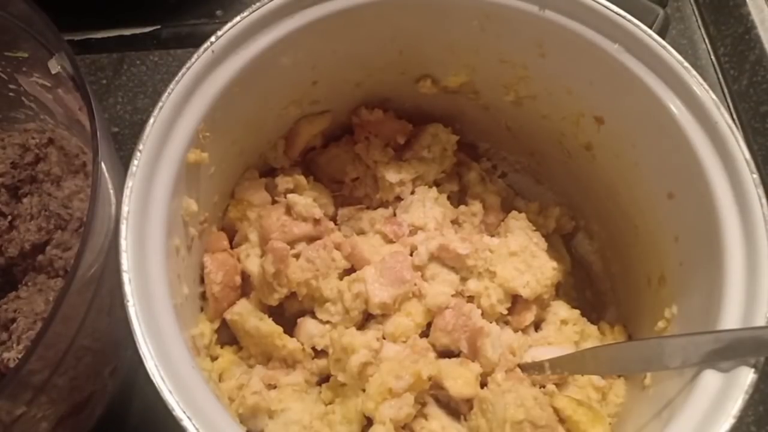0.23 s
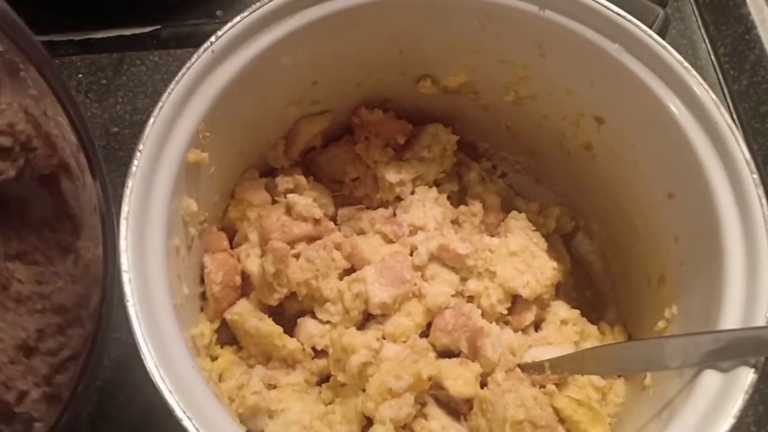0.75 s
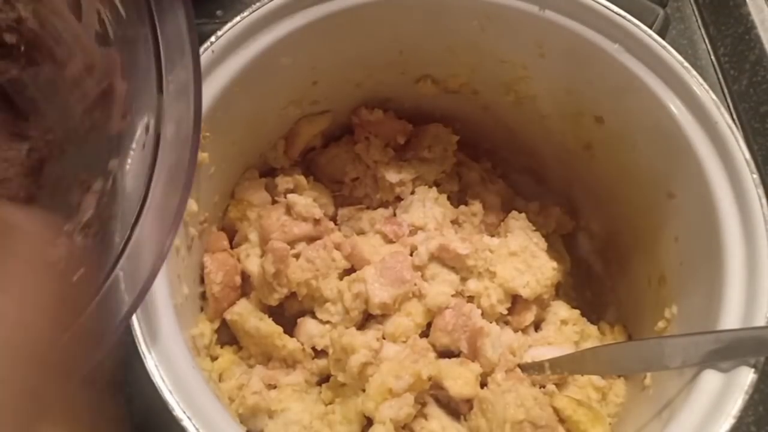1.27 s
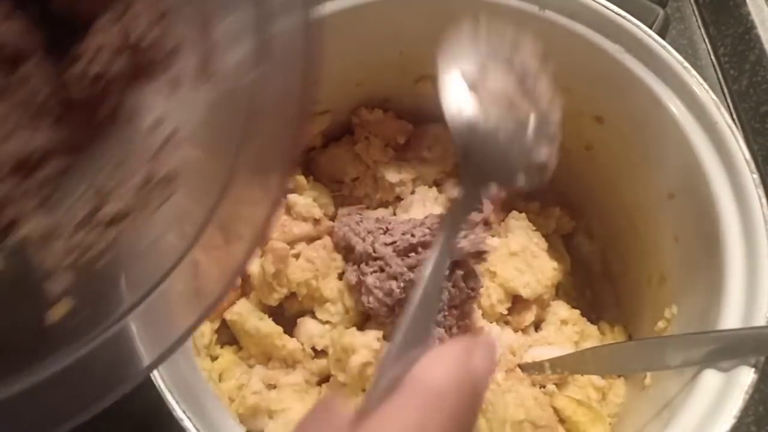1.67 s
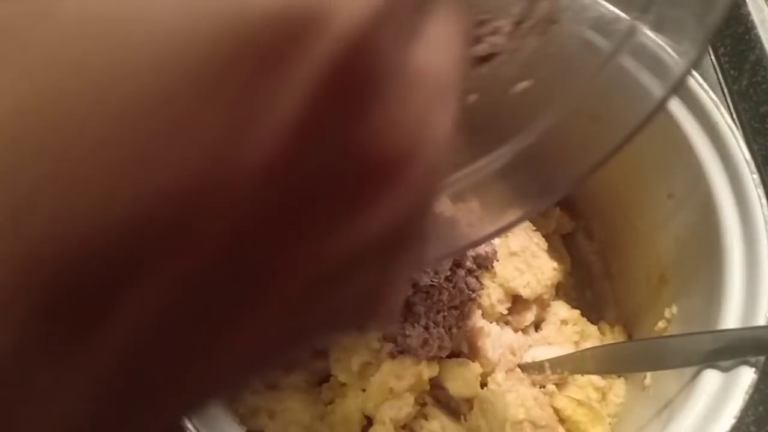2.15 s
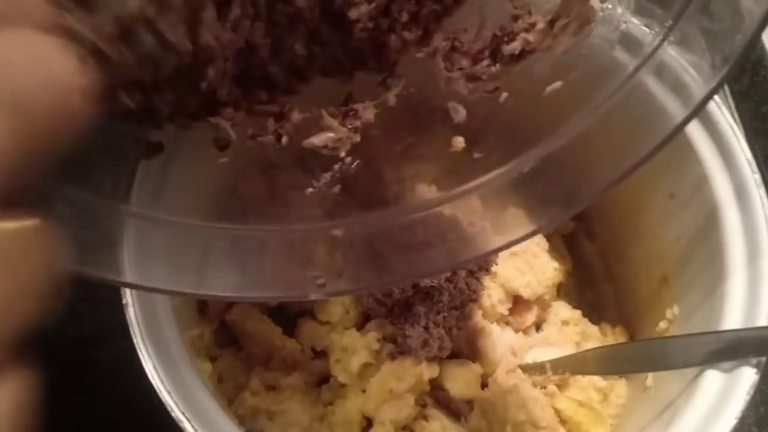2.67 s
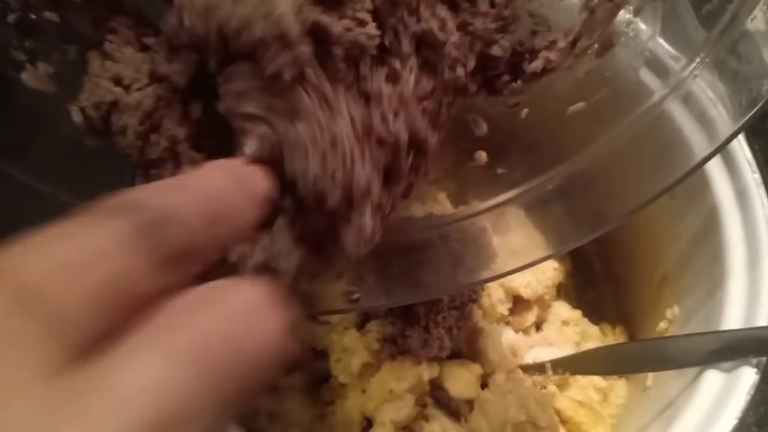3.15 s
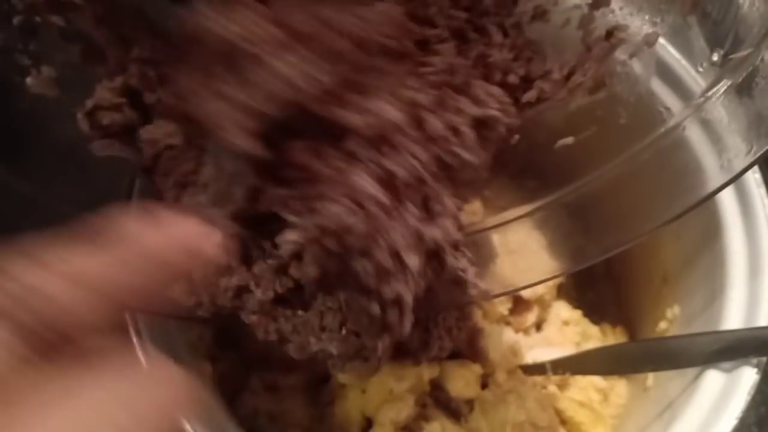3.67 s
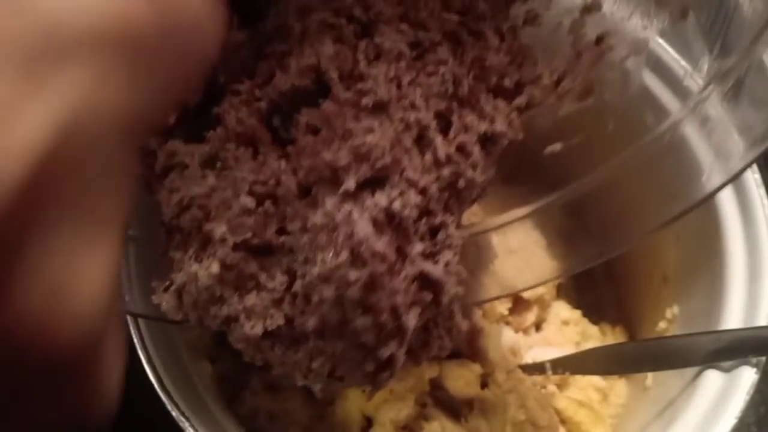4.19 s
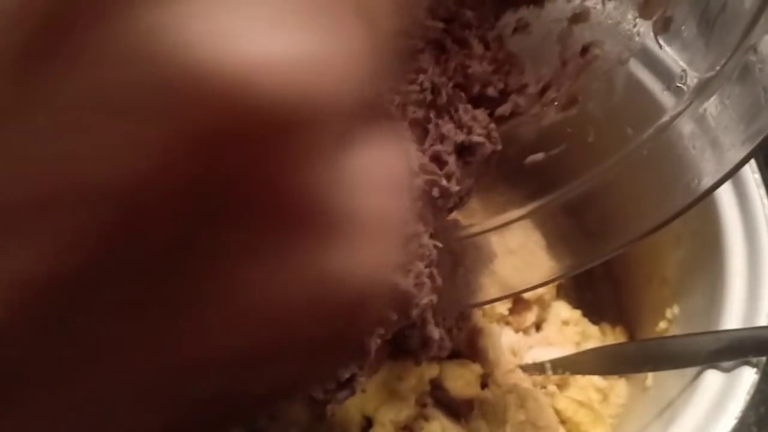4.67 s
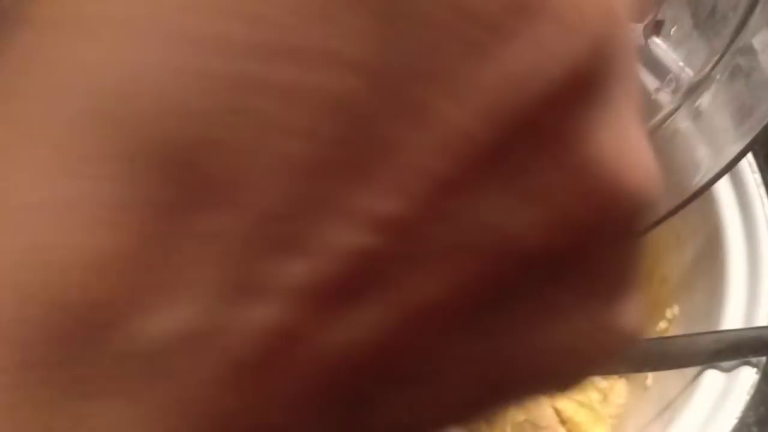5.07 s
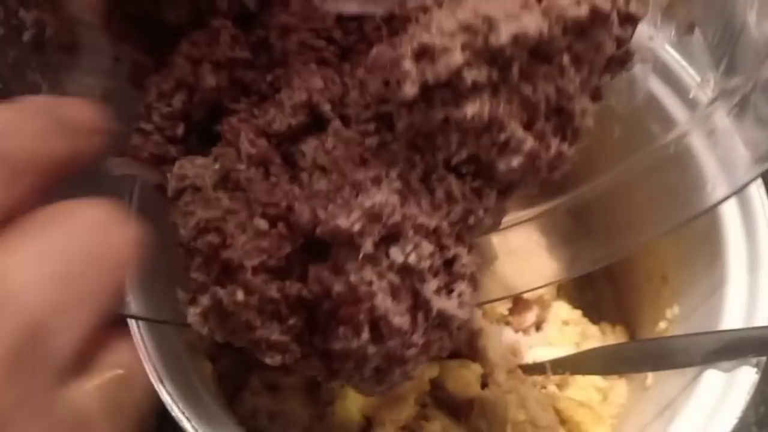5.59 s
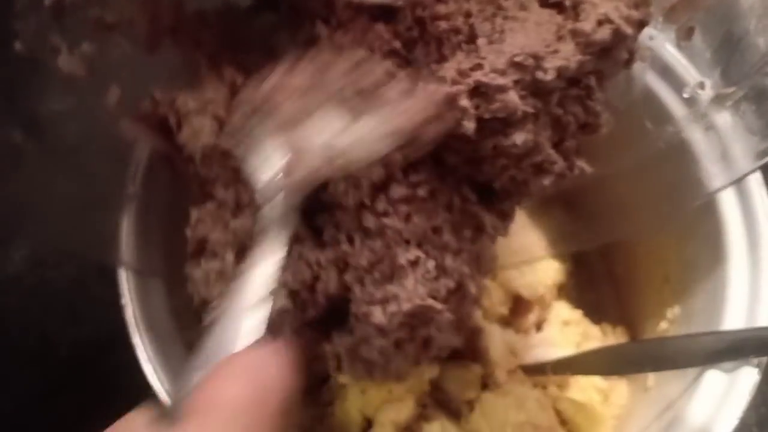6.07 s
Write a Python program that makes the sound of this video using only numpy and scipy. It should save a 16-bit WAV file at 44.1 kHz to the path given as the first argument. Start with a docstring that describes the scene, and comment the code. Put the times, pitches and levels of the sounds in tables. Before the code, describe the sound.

A spoon works a thick, damp mixture out of a glass bowl resting on a metal pot, close to the microphone. Short gritty rasps and wet squelches come in uneven strokes. Damped, hollow knocks and bright spoon clinks cut through, strongest past the middle, then a piercing glass squeak rings briefly. Scraping continues to the end, with faint room air and short indoor reflections.

```python
"""A spoon scrapes a thick, moist mixture out of a glass bowl: friction made of noise and tiny random slips.
The bowl is slid off a kitchen counter and tipped over a metal pot, close to the microphone.
Spoon, bowl and pot knock together: shaped noise bursts, with decaying sines for pot, counter and spoon.
Sticking on the glass gives gliding squeals (sines with overtones) and rough skids (narrow noise).
A small hard room answers through a noise-built impulse response; faint air noise lies beneath."""
import sys
import numpy as np
from scipy import signal
from scipy.fft import rfft, irfft, next_fast_len
from scipy.io import wavfile

SR = 44100
rng = np.random.default_rng(int(sys.argv[2]) if len(sys.argv) > 2 else 0)


def inscribe(sig):
    """Save sig as 16-bit PCM at rate SR to the path in sys.argv[1].

    A 1-D sig is mono; a 2-D sig holds one channel per row.
    Samples are clipped to [-1, 1] before scaling.
    """
    pcm = np.round(np.clip(np.atleast_2d(sig).T, -1, 1) * 32767)
    wavfile.write(sys.argv[1], SR, pcm.astype(np.int16))


N = 279594
TIME = np.arange(N) / SR

# Still air of the kitchen: (frequency [Hz], relative density [dB per Hz])
AIR_SPECTRUM = [(22, -1), (35, -2.5), (48, 8.5), (62, -3), (80, -5), (140, 2.5), (300, -10), (480, -2.5),
                (800, -9), (1400, -15.5), (2500, -6.5), (3500, -29.5), (4900, -15), (7000, -29),
                (10500, -33.5), (13500, -36), (16000, -31.5)]
AIR_DB = -62.5
# Room decay: (frequency [Hz], t60 [s])
ROOM_DECAY = [(100, 0.58), (500, 0.53), (2500, 0.38), (6000, 0.42), (15000, 0.57)]
SQUEAL_ROOM_DB = 7   # the squeal radiates from the whole bowl, more of it into the room
RIGHT_LEAD_S, CUTOFF_HZ = 0.00024, 16000

# Dull bumps that set the counter booming: (time [s], relative level [dB], favoured pitch [Hz])
COUNTER_BUMPS = [(1.338, -40.5, 114), (1.43, -46, 135), (2.136, -42.5, 132), (2.205, -53.5, 151),
                 (3.667, -53.5, 147.3), (3.714, -58, 304), (4.373, -46, 259), (5.227, -55, 230),
                 (6.072, -61, 125)]
# Counter modes: (frequency [Hz], relative level [dB], t60 [s])
COUNTER_RINGS = [(113.7, 3, 0.47), (121.6, -18, 0.18), (142.6, 1.5, 0.17), (165.7, -1.5, 0.55),
                 (218, -0.5, 0.23), (240.6, -1.5, 0.28), (306, -8.5, 0.064)]
# Modes of the bowl resting on the pot: (frequency [Hz], relative level [dB], t60 [s])
POT_RINGS = [(239.8, -4, 0.21), (298, -5, 0.19), (485.2, -1, 0.17), (540, 2, 0.04), (576, -6, 0.11),
             (918, -10.5, 0.18), (1020, -15.5, 0.4), (1067.6, -2.5, 0.11), (1208, 0.5, 0.066),
             (1244, -19.5, 0.042), (1296, -6.5, 0.085), (1362, -6.5, 0.052), (1790, -10, 0.034),
             (1960, -24.5, 0.13), (2430, -22.5, 0.14), (2690, -28.5, 0.073), (2867, -8.5, 0.055)]

# The spoon rings freely: (time [s], relative level [dB])
SPOON_CLINKS = [(2.143, -43), (4.376, -37.5)]
# Spoon modes: (frequency [Hz], relative level [dB], t60 [s])
SPOON_RINGS = [(1927, -4, .16), (2300, -8, .07), (3880, -6, .06), (4021, -2, .11), (4330, -7, .05),
               (4694, -5, .08), (4823, -7, .09), (4960, -8, .06), (5098, -16, .1), (13600, -16, .07)]
# Spoon against glass, bending note: (time [s], first pitch [Hz], last pitch [Hz], level [dB], t60 [s])
SPOON_TWANGS = [(2.992, 960, 920, -25, .15), (4.374, 325, 280, -19, .15), (4.375, 1270, 1220, -19.5, .18),
                (4.765, 1400, 1190, -18, .1), (5.228, 1240, 1160, -23, .2), (5.603, 1280, 1200, -31, .09),
                (5.711, 1420, 1380, -19, .07)]

# Placed sticky ticks: (time [s], relative level [dB], pitch [Hz])
PLACED_TICKS = [(0.18, -40, 3140), (1.624, -33.5, 5070), (2.2985, -34.5, 5200), (2.376, -34, 4930),
                (2.8505, -32, 4740), (2.958, -32.5, 2680), (3.1316, -31.5, 1850), (3.4644, -38, 2180),
                (3.8327, -35, 2780), (3.905, -32.5, 2350), (3.9417, -26.5, 2435), (3.9693, -29.5, 2490),
                (4.0807, -38.5, 5240), (4.113, -32.5, 5000), (5.0308, -38, 3050), (5.077, -33, 5400),
                (5.871, -33.5, 4980), (5.93, -32, 2530)]
# Tick spectrum: (frequency [Hz], relative level [dB])
TICK_SPECTRUM = [(300, -28.5), (1200, -3.5), (2700, 2), (3700, -8.5), (5300, 6), (7500, -13),
                 (10500, -16.5), (13500, -12), (16000, -10)]
# Random ticks during strokes
TICKS_PER_S, TICK_OVER_SQUELCH_DB, TICK_SPREAD_DB = 9.7, 10.5, 12
TICK_LOW_HZ, TICK_HIGH_HZ = 2200, 5400

# Lumps of mixture slump: (start [s], length [s], relative level [dB])
LUMP_SLUMPS = [(-0.02, 0.025, -37.5), (1.6, 0.033, -44.5), (2.18, .06, -48), (3.085, 0.032, -37.5),
               (3.67, 0.027, -65), (4.03, 0.042, -59), (6.055, 0.071, -36.5)]
# Slump spectrum: (frequency [Hz], relative level [dB])
SLUMP_SPECTRUM = [(50, -23), (120, -5.5), (260, -2.5), (500, -8.5), (900, -11), (2000, -14), (4000, -24)]
SLUMP_ATTACK_S, SLUMP_T60_S = 0.0067, 0.3
# The bowl drags and judders: (start [s], length [s], relative level [dB])
BOWL_DRAGS = [(-0.03, 0.24, -44.5), (0.47, 0.19, -33.5), (0.57, 0.16, -29), (2.55, 0.19, -50),
              (3.15, 0.6, -58.5), (5.566, .015, -39.5), (6.05, 0.026, -44.5)]
# Drag spectrum: (frequency [Hz], relative level [dB])
DRAG_SPECTRUM = [(120, -22), (250, -3), (380, 1.5), (480, -0.5), (580, 10), (700, -8), (850, -1.5),
                 (1200, -26), (1600, -41)]
DRAG_ATTACK_S, DRAG_T60_S = 0.013, 0.61

# Rough half-squeals while the spoon skids: (start [s], length [s], pitch [Hz], level [dB])
SPOON_SKIDS = [(0.009, 0.11, 2860, -39), (0.022, 0.075, 1980, -40.5), (0.177, 0.027, 2900, -40.5),
               (0.305, 0.016, 3030, -30), (1.216, 0.046, 2800, -50), (2.142, 0.023, 4440, -26),
               (2.855, 0.013, 4800, -37.5), (3.017, 0.01, 2280, -22), (3.462, 0.013, 2570, -42.5),
               (5.2, 0.029, 1260, -24.5), (5.212, 0.009, 1950, -7), (5.602, 0.011, 634, -31),
               (5.923, 0.22, 2430, -47), (6.188, 0.2, 2240, -44)]
# Squeals: (start [s], length [s], first pitch [Hz], last pitch [Hz], relative level [dB], release t60 [s])
GLASS_SQUEALS = [(5.14, 0.027, 2785, 2481, -1, 0.16), (5.595, 0.074, 2322, 2180, -28.5, .12),
                 (6.177, .16, 2110, 2390, -46, .1)]
# Squeal overtones: (multiple of the pitch, level at full strength [dB])
SQUEAL_OVERTONES = [(.5, -51), (1.5, -53), (2, -35), (5, -55)]
# Glass singing on after a squeal: (frequency [Hz], relative level [dB], t60 [s])
GLASS_RINGS = [(2510, -19, 0.67), (2600, -12, 0.36), (2670, -33.5, 0.44), (2500, -21, .35)]
SQUEAL_ATTACK_S, SQUEAL_GLIDE_S, SQUEAL_GRIP_S = 0.018, 0.0416, 0.039
SQUEAL_FLUTTER_DB, SQUEAL_FLUTTERS_PER_S = 6, 130

# Knocks of spoon, bowl and pot: (time [s], relative strength [dB], weight behind the blow [dB],
# hardness [dB per octave], L-R [dB], rattle re first contact [dB], pot ring re blow [dB],
# low favoured pitch [Hz], high favoured pitch [Hz])
BLOWS = [(0.307, -40.5, 7, 4, 0.5, -3, 1, 593, 1900), (0.675, -16, 3, 0.86, 2, -8, -17, 452, 2160),
         (0.686, -31.5, -12, -5, -2, -2, 2, 460, 2050), (0.8, -25, 0.5, 5, -3, -4.5, -6, 510, 1910),
         (0.88, -35.5, 6.5, 1.5, -3, -2, -1, 446, 1900), (1.113, -39, 13, 1.4, -4.5, -1.5, -6, 291, 940),
         (1.331, -27.5, 8, -2, -2, 7.5, 0.5, 598, 783), (1.426, -37.5, 15.5, 1.5, -4, -6, -3, 300, 786),
         (2.136, -19.5, 23.5, 2.1, 0.5, -10, -8.5, 367, 2070),
         (2.413, -20.5, -8.5, -0.25, -8.5, -17, -10, 592, 2135), (2.86, -56, 8, 10.5, 0, -12, 1, 584, 920),
         (2.989, -18.5, -7.5, 0.5, -6.5, -10, -5.5, 518, 1533),
         (3.017, -24.5, -4, 4, 2.5, 0, -30, 545, 2000), (3.026, -33, -21, -2.5, -5, -8, -0.5, 435, 920),
         (3.665, -32, 15, 0.8, 3.5, -5, -10, 278, 2130), (3.713, -49.5, 9, -6.5, -10, -3, -4, 487, 610),
         (3.916, -33.5, -3, -4, 2, -4, -8.5, 543, 633), (4.372, -14.5, 7, 3, 1.5, 1, -5.5, 475, 1270),
         (4.472, -16.5, -4.5, 3.5, -4.5, -6.5, -10, 505, 1103),
         (4.491, -23, -12, 3, 6, -15.5, -12.5, 470, 1070), (4.762, -20, -9, 2, 0.5, -11, -3.5, 519, 1235),
         (5.213, -23.5, -4.5, 4.5, -0.5, -1, 2, 785, 1810), (5.226, -16, -4, 1.5, -1, 3, -13.5, 479, 1410),
         (5.567, -40.5, -21, -8, -6, -1, 0.5, 517, 930),
         (5.602, -32, -12, -5.5, -2.5, -26, -6.5, 576, 1310),
         (5.71, -21.5, -3.5, 1.3, 3.5, -10, -25, 456, 1326)]
# Borders of the five knock registers: (frequency [Hz])
REGISTER_EDGES_HZ = [125, 280, 750, 1600, 3300, 16000]
# Thump, hollow, clack, clink, edge; weight adds thump, deadens clack: (relative level [dB], weight share)
REGISTERS = [(-12.5, 0.84), (-0.5, 0.089), (-3, -0.2), (1, -0.069), (-13, 0.27)]
# Knock spectrum: (frequency [Hz], relative density [dB per Hz])
KNOCK_SPECTRUM = [(80, -3.5), (300, -5.5), (500, 4), (750, -11), (1300, -8), (2400, 6.5), (3200, -6),
                  (3850, -8.5), (5100, -2.5), (6200, -12), (7200, -21.5), (10500, -37), (13500, -23),
                  (16000, -38)]
KNOCK_DB = -16

# Spoon strokes: (start [s], length [s], relative levels of rasp on the glass [dB],
# squelch of the mixture [dB], fine wet crackle [dB])
SPOON_STROKES = [(-0.03, 0.41, -48.5, -61, -83), (0.431, .32, -47, -50.5, -66), (0.78, 0.14, -44, -59, -86),
                 (0.942, 0.29, -54.5, -59, -73.5), (1.451, 0.16, -56, -63, -77),
                 (1.581, 0.023, -47.5, -54.5, -62.5), (1.84, .25, -61.5, -75, -87),
                 (2.231, 0.2, -53, -58, -74), (2.423, 0.29, -43.5, -48, -66.5),
                 (2.75, 0.1, -57, -55.5, -64.5), (3.015, 0.28, -55, -56.5, -67.5),
                 (3.337, 0.11, -58.5, -58, -78), (3.475, 0.37, -49, -54, -70),
                 (3.877, .24, -54.5, -54.5, -71), (4.16, 0.14, -60.5, -69, -91),
                 (4.499, 0.14, -44.5, -56.5, -92), (4.785, 0.16, -44, -47.5, -68.5),
                 (5.004, .08, -59, -56, -70), (5.257, 0.22, -57, -56, -72.5),
                 (5.521, 0.081, -47.5, -50.5, -68.5), (5.79, 0.29, -48.5, -53, -70.5),
                 (6.081, .26, -52, -52.5, -72.5)]
# Rasp spectrum: (frequency [Hz], relative level [dB])
RASP_SPECTRUM = [(250, -19.5), (550, -4), (800, -4.5), (1300, -8.5), (1950, 0.5), (2300, -0.5), (2800, 2.5),
                 (3500, -12), (4500, -16.5)]
# Squelch spectrum: (frequency [Hz], relative level [dB])
SQUELCH_SPECTRUM = [(2500, -29.5), (3600, -3), (4400, -1.5), (5200, 5), (6200, -6), (7500, -13),
                    (10000, -30)]
# Crackle spectrum: (frequency [Hz], relative level [dB])
CRACKLE_SPECTRUM = [(5500, -3.5), (7500, -20), (10500, -1), (12000, 2.5), (13700, 4.5), (15200, 6.5),
                    (16000, -10.5)]
STROKE_ATTACK_S, STROKE_T60_S = 0.039, 0.33
STROKE_WOBBLE_DB, STROKE_WOBBLES_PER_S = -1.5, 16


def from_db(db):
    """Decibels to gain."""
    return 10 ** (np.asarray(db) / 20)


def rms_one(x):
    """Scale to unit power."""
    return x / np.sqrt(np.mean(x ** 2) + 1e-20)


def at_hz(points, hz):
    """Read a table along log frequency."""
    f, value = np.transpose(points)
    return np.interp(np.log(np.maximum(hz, 1)), np.log(f), value)


def band(x, low_hz, high_hz):
    """Causal band-pass."""
    edges_hz = [low_hz, min(high_hz, .45 * SR)]
    return signal.sosfilt(signal.butter(3, edges_hz, "band", fs=SR, output="sos"), x)


def coloured(x, spectrum):
    """Filter by a spectrum that falls away steeply beyond its ends; rms 1."""
    size = next_fast_len(x.shape[-1])
    hz = np.fft.rfftfreq(size, 1 / SR) + 1
    skirts = np.minimum(1, np.minimum(hz / spectrum[0][0], spectrum[-1][0] / hz)) ** 3
    shaped = irfft(rfft(x, size) * from_db(at_hz(spectrum, hz)) * skirts, size)
    return rms_one(shaped[..., :x.shape[-1]])


def drift(knots_per_s):
    """Random curve, linear between knots; rms 1."""
    knots = rng.standard_normal(int(N / SR * knots_per_s) + 2)
    return rms_one(np.interp(TIME * knots_per_s, np.arange(len(knots)), knots))


def noise(size, alike):
    """Stereo white noise; alike is the power share common to both ears."""
    alike = np.clip(alike, 0, 1)
    shared, *separate = rng.standard_normal((3, size))
    return np.sqrt(alike) * shared + np.sqrt(1 - alike) * np.array(separate)


def dying(t, t60_s):
    """Exponential decay."""
    return from_db(-60 * t / t60_s)


def add(out, start_s, sound):
    """Mix a sound in at a time."""
    i = max(0, int(start_s * SR))
    out[..., i:i + sound.shape[-1]] += sound[..., :N - i]


def swell(start, length, attack_s, t60_s):
    """A push builds up, holds until its length is over and dies away."""
    t = TIME - start
    attack = np.sin(np.pi / 2 * np.clip(t / attack_s, 0, 1)) ** 2
    return attack * dying(np.maximum(t - length, 0), t60_s)


def pushes(rows, attack_s, t60_s):
    """One gain curve for each level column of (start, length, dB, ..) rows; overlaps add in power."""
    power = 0
    for start, length, *db in rows:
        power = power + (from_db(db)[:, None] * swell(start, length, attack_s, t60_s)) ** 2
    return np.sqrt(power)


def friction(spectrum, per_s, size_db, clump_db, smooth):
    """Clumps of tiny slips of uneven size over a smooth rub; rms 1."""
    slips = rng.random(N) < per_s * from_db(clump_db * drift(45)) / SR
    sizes = from_db(np.abs(size_db) * np.minimum(rng.exponential(1, N), 4))
    grains = rms_one(slips * sizes * noise(N, 0.11))
    return coloured(grains + smooth * noise(N, 0.52), spectrum)


def struck(blows, modes, scatter_db, phase_spread):
    """Every blow (s, dB at each mode) rings all modes, in a slightly different phase at either ear."""
    out, t = np.zeros((2, N)), TIME[:SR]
    hz, mode_db, t60_s = np.transpose(modes)
    onset = np.tanh(hz[:, None] * t)
    rings = np.exp(2j * np.pi * hz[:, None] * t) * dying(t, t60_s[:, None]) * onset
    for s, db in blows:
        strength = from_db(db + mode_db + scatter_db * rng.standard_normal(len(hz)))
        phase = np.exp(1j * phase_spread * rng.standard_normal((2, len(hz))))
        add(out, s, ((strength * phase) @ rings).imag)
    return out


def nearness(modes, favoured_hz, octaves):
    """1 for a mode that the point of contact favours, 0 for distant ones."""
    return np.exp(-(np.log2(np.array(modes)[:, 0] / favoured_hz) / octaves) ** 2)


def resonant(x, pitches_hz, q, boost_db):
    """Lift a narrow peak at each pitch."""
    peaks = sum(signal.lfilter(*signal.iirpeak(hz, q, fs=SR), x) for hz in pitches_hz)
    return x + from_db(boost_db) * peaks


def knock_centres():
    """Middle of each register of a knock, in Hz."""
    return np.sqrt(np.multiply(REGISTER_EDGES_HZ[:-1], REGISTER_EDGES_HZ[1:]))


def knock_levels(strength_db, weight_db, hardness_db):
    """Level of each register: a hard contact tilts it to the treble, a heavy one thumps."""
    plain_db, weight_share = np.transpose(REGISTERS)
    octaves = np.log2(knock_centres() / np.median(knock_centres()))
    return strength_db + plain_db + weight_share * weight_db + hardness_db * octaves


def still_air():
    """Steady coloured noise of a quiet kitchen."""
    return from_db(AIR_DB) * coloured(noise(N, 0.68), AIR_SPECTRUM)


def kitchen(x, early_db=-11, early_t60_s=0.1, late_db=-10, gap_s=.009):
    """Quick reflections off counter and wall, and a diffuse tail with its own decay in each band."""
    t, edges_hz = TIME[:SR], np.geomspace(60, 18000, 10)
    response = 0
    for low, high in zip(edges_hz, edges_hz[1:]):
        hz = np.sqrt(low * high)
        early = from_db(early_db) * rms_one(dying(t, early_t60_s))
        late = from_db(late_db) * rms_one(dying(t, at_hz(ROOM_DECAY, hz)))
        shape = np.hypot(early, late) / np.sqrt(len(t))
        alike = 1 / (1 + (hz / 600) ** 2)   # long waves reach both microphones alike
        response = response + band(noise(len(t), alike) * shape, low, high)
    out = np.zeros((2, N))
    add(out, gap_s, signal.fftconvolve(x, response, axes=1)[:, :N])
    return out


def microphones(x, shared_below_hz=260):
    """The right port is reached first; long waves are nearly the same at both."""
    x = np.array([np.interp(TIME - RIGHT_LEAD_S, TIME, x[0]), x[1]])
    high_pass = signal.butter(1, shared_below_hz, "high", fs=SR, output="sos")
    side = signal.sosfilt(high_pass, (x[0] - x[1]) / 2)
    return x.mean(axis=0) + np.array([side, -side])


def counter(favour_db=18):
    """Heavy bumps pass through the pot into the counter and ring its modes."""
    blows = []
    for s, db, favoured_hz in COUNTER_BUMPS:
        blows.append((s, db + favour_db * nearness(COUNTER_RINGS, favoured_hz, octaves=0.31)))
    return struck(blows, COUNTER_RINGS, scatter_db=-1.0, phase_spread=0.046)


def pot(favour_db=10):
    """The pot takes up the colour of each knock, most of all in the modes under the point of contact."""
    hz, blows = np.array(POT_RINGS)[:, 0], []
    for s, strength_db, weight_db, hardness_db, _, _, ring_db, low_hz, high_hz in BLOWS:
        register_db = knock_levels(strength_db, weight_db, hardness_db)
        colour_db = at_hz(list(zip(knock_centres(), register_db)), hz)
        favoured = nearness(POT_RINGS, low_hz, octaves=0.092) + nearness(POT_RINGS, high_hz, octaves=0.14)
        blows.append((s, colour_db + ring_db + favour_db * favoured))
    return struck(blows, POT_RINGS, scatter_db=1.0, phase_spread=0.52)


def slumps():
    """Lumps of mixture slump: short swells of low friction noise."""
    gain = pushes(LUMP_SLUMPS, SLUMP_ATTACK_S, SLUMP_T60_S) * from_db(-6.5)
    return gain * friction(SLUMP_SPECTRUM, per_s=240, size_db=-0.5, clump_db=-2, smooth=0.98)


def bowl_drags():
    """The bowl drags and judders: dense slips in the low mids."""
    gain = pushes(BOWL_DRAGS, DRAG_ATTACK_S, DRAG_T60_S) * from_db(-7)
    return gain * friction(DRAG_SPECTRUM, per_s=3900, size_db=0.5, clump_db=1.5, smooth=1.0)


def clinks():
    """The spoon rings freely in its own modes."""
    return struck(SPOON_CLINKS, SPOON_RINGS, scatter_db=-4.0, phase_spread=1.0)


def twangs(ease_s=0.016):
    """A pressed spoon is stiffer; its bending note drops as it rebounds."""
    out, t = np.zeros(N), TIME[:SR // 3]
    for s, first_hz, last_hz, db, t60_s in SPOON_TWANGS:
        hz = last_hz + (first_hz - last_hz) * np.exp(-t / ease_s)
        tone = np.sin(2 * np.pi * np.cumsum(hz) / SR)
        add(out, s, from_db(db) * tone * dying(t, t60_s) * np.tanh(hz * t))
    return out


def knocks(rattle_alike=0.36, contact_alike=0.59, contact_s=0.0022, contact_cycles=1.0,
           rattle_t60_s=0.037, rattle_cycles=22):
    """The packed bowl is heavily damped: a crack of a few ms and a short rattle, tuned by the contact point."""
    out, t = np.zeros((2, N)), TIME[:SR // 4]
    for s, strength_db, weight_db, hardness_db, pan_db, rattle_db, _, low_pitch_hz, high_pitch_hz in BLOWS:
        register_db = knock_levels(strength_db, weight_db, hardness_db)
        crack = coloured(noise(len(t), contact_alike), KNOCK_SPECTRUM)
        rattle = coloured(noise(len(t), rattle_alike), KNOCK_SPECTRUM)
        blow = 0
        for db, hz, low, high in zip(register_db, knock_centres(), REGISTER_EDGES_HZ, REGISTER_EDGES_HZ[1:]):
            u = t / (contact_s + contact_cycles / hz)   # low notes speak later and last longer
            first = rms_one(band(crack * np.sqrt(u) * np.exp(-2 * u * u), low, high))
            rattle_shape = np.tanh(u) * dying(t, rattle_t60_s + rattle_cycles / hz)
            rest = rms_one(band(rattle * rattle_shape, low, high))
            mix = first + from_db(rattle_db) * rest
            note = resonant(mix, (low_pitch_hz, high_pitch_hz), q=7.3, boost_db=8.5)
            blow = blow + from_db(db) * np.array([rms_one(ear) for ear in note])
        add(out, s, blow * from_db(KNOCK_DB + np.array([[pan_db], [-pan_db]]) / 2))
    return out


def skids(width=0.12, rough_db=4):
    """The spoon breaks loose and chatters around a pitch: narrow noise, flickering in level, fading out."""
    out = np.zeros((2, N))
    for s, length, hz, db in SPOON_SKIDS:
        t = TIME[:int(length * SR)]
        rub = rms_one(band(noise(SR // 2, 0.46), hz * (1 - width), hz * (1 + width)))[:, :len(t)]
        gain = from_db(db + rough_db * drift(248.6)[:len(t)])
        add(out, s, gain * rub * (1 - t / length))
    return out


def squeals(jitter=0.0055, full_db=-7, pan_db=-2):
    """Stick-slip locks into a gliding tone; overtones grow with its strength and the glass rings on."""
    tone = np.zeros(N)
    for start, length, first_hz, last_hz, db, t60_s in GLASS_SQUEALS:
        since = np.maximum(TIME - start, 0)
        hz = last_hz + (first_hz - last_hz) * np.exp(-since / SQUEAL_GLIDE_S)
        slipping = np.tanh(since / SQUEAL_GRIP_S) ** 2   # the grip is clean at first, then stutters
        flutter_db = SQUEAL_FLUTTER_DB * slipping * drift(SQUEAL_FLUTTERS_PER_S)
        strength = from_db(db + flutter_db) * swell(start, length, SQUEAL_ATTACK_S, t60_s)
        phase = 2 * np.pi * np.cumsum(hz * (1 + jitter * drift(300))) / SR
        overtones = sum(from_db(d) * np.sin(k * phase) for k, d in SQUEAL_OVERTONES)
        tone += from_db(-8.0) * strength * (np.sin(phase) + strength / from_db(full_db) * overtones)
    t, glass = TIME[:SR], 0
    for hz, db, t60_s in GLASS_RINGS:
        glass = glass + from_db(db) * np.sin(2 * np.pi * hz * t) * dying(t, t60_s)
    singing = from_db(-51) * signal.fftconvolve(tone, glass)[:N]
    return (tone + singing) * from_db(np.array([[pan_db], [-pan_db]]) / 2)


def stray_ticks():
    """Random ticks strewn over the strokes, louder with more squelch: (s, relative dB, pitch Hz)."""
    rows = []
    for start, length, _, squelch_db, _ in SPOON_STROKES:
        for when, size, pitch in rng.random((int(round(TICKS_PER_S * length)), 3)):
            s = min(start + when * length, TIME[-1])
            db = squelch_db + TICK_OVER_SQUELCH_DB + TICK_SPREAD_DB * (2 * size - 1)
            rows.append((s, db, TICK_LOW_HZ * (TICK_HIGH_HZ / TICK_LOW_HZ) ** pitch))
    return rows


def ticks(t60_s=0.035, level_db=-7, pop_db=-3, pop_width=0.34):
    """Moist strands snap away from the glass, each with a small pitched pop."""
    out, t = np.zeros((2, N)), TIME[:SR // 20]
    for s, db, hz in PLACED_TICKS + stray_ticks():
        snap = coloured(noise(len(t), 0.29), TICK_SPECTRUM)
        pop = rms_one(band(noise(len(t), 0.17), hz / (1 + pop_width), hz * (1 + pop_width)))
        add(out, s, from_db(db + level_db) * (snap + from_db(pop_db) * pop) * dying(t, t60_s))
    return out


def scraping():
    """The spoon rasps on the glass and squeezes the wet mixture under an unsteady hand."""
    pressure = from_db(STROKE_WOBBLE_DB * drift(STROKE_WOBBLES_PER_S))
    rasping, squeezing, crackling = pressure * pushes(SPOON_STROKES, STROKE_ATTACK_S, STROKE_T60_S)
    rasp = friction(RASP_SPECTRUM, per_s=3100, size_db=5, clump_db=2.5, smooth=0.99)
    squelch = friction(SQUELCH_SPECTRUM, per_s=2300, size_db=1.5, clump_db=6.5, smooth=0.42)
    crackle = friction(CRACKLE_SPECTRUM, per_s=760, size_db=2.5, clump_db=7.5, smooth=0.87)
    return rasping * from_db(-2.5) * rasp + squeezing * squelch + crackling * from_db(7) * crackle


def scene():
    """Everything happens close by, in a quiet kitchen."""
    bodies = counter() + pot() + slumps() + bowl_drags()
    spoon = clinks() + twangs() + knocks() + skids() + ticks() + scraping()
    near = bodies + spoon
    squeal = squeals()
    room = kitchen(near + from_db(SQUEAL_ROOM_DB) * squeal)
    return microphones(near) + squeal + room + still_air()


def record(dry):
    """Peaks stop at full scale and the top is cut."""
    low_pass = signal.ellip(10, .2, 80, CUTOFF_HZ, fs=SR, output="sos")
    return signal.sosfilt(low_pass, np.clip(dry, -1, 1))


dry = scene()
out = record(dry)
inscribe(out)
```